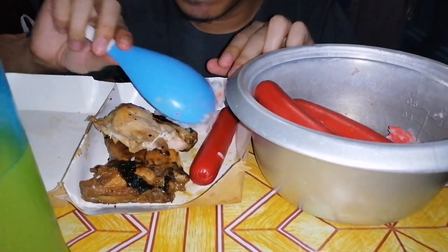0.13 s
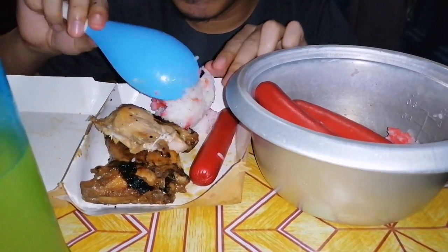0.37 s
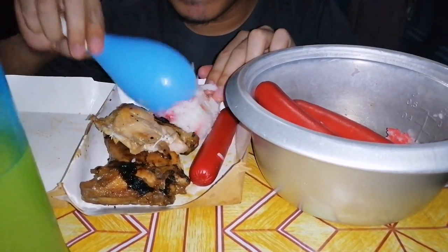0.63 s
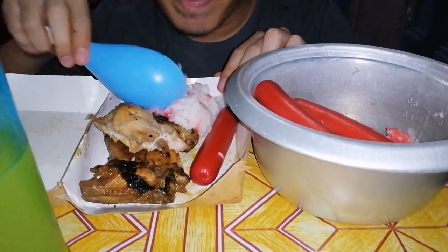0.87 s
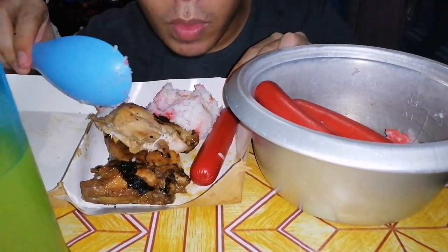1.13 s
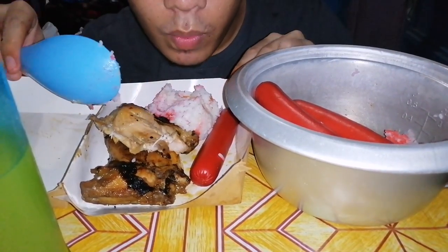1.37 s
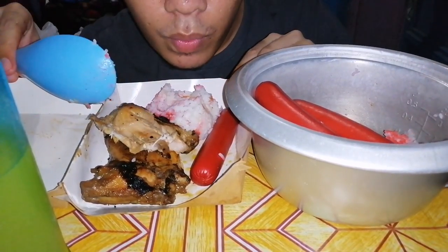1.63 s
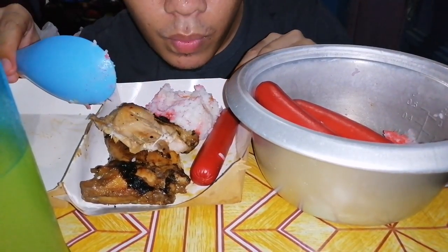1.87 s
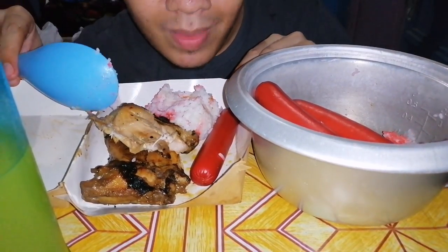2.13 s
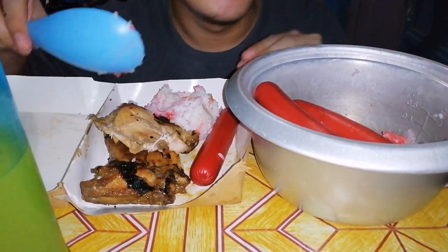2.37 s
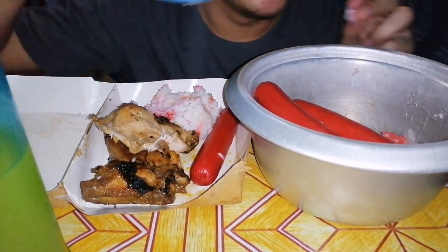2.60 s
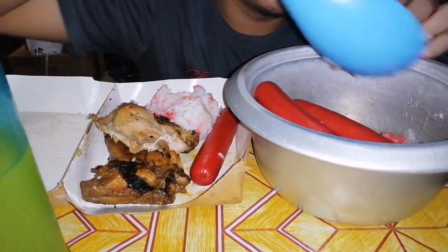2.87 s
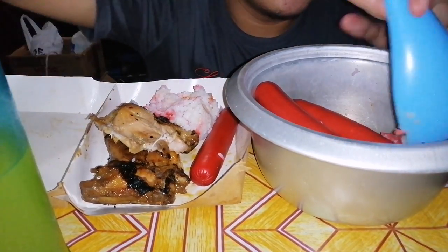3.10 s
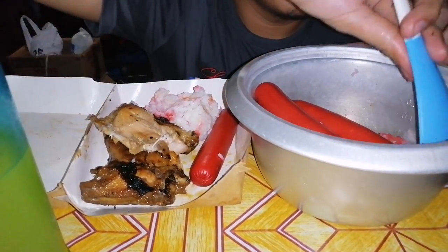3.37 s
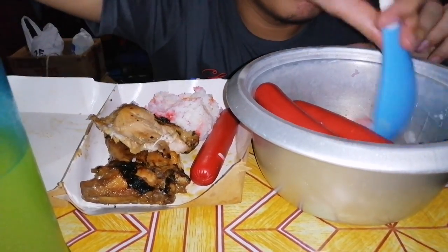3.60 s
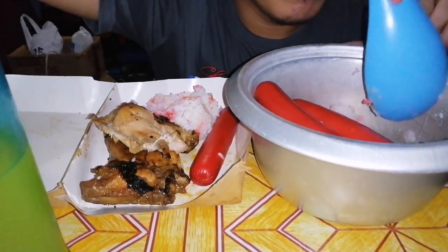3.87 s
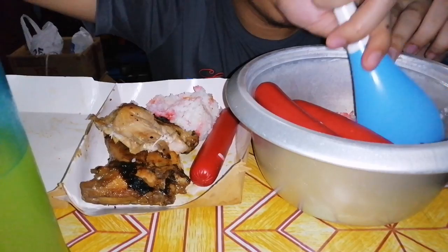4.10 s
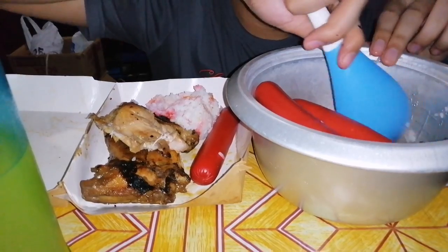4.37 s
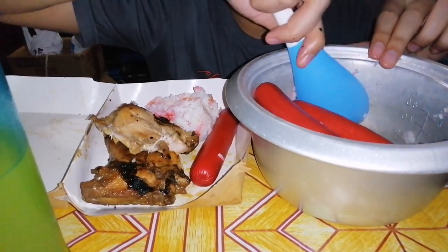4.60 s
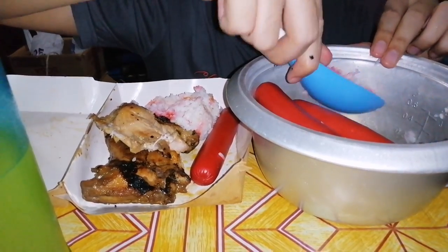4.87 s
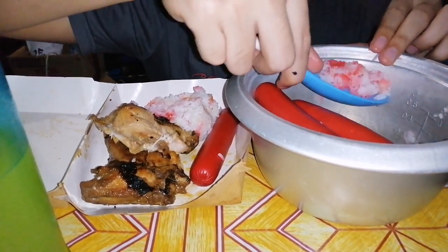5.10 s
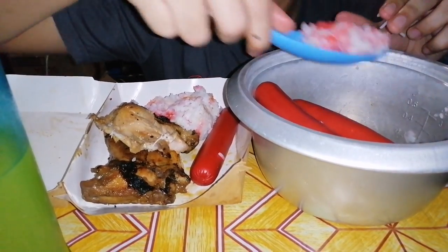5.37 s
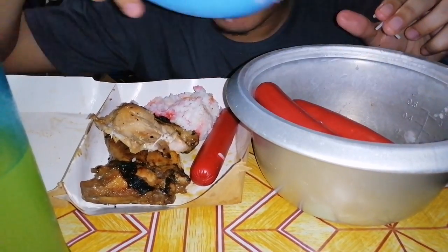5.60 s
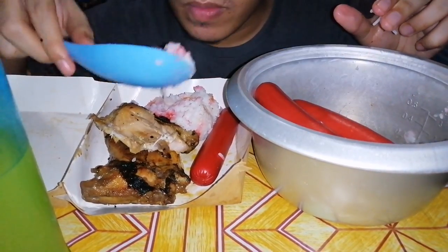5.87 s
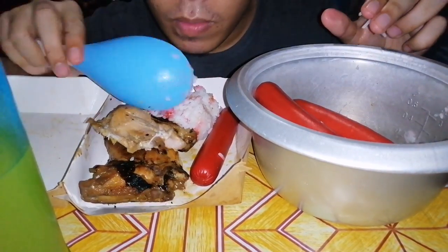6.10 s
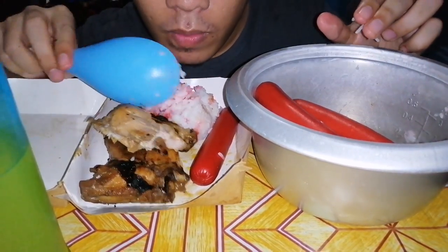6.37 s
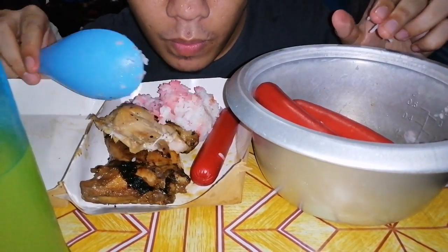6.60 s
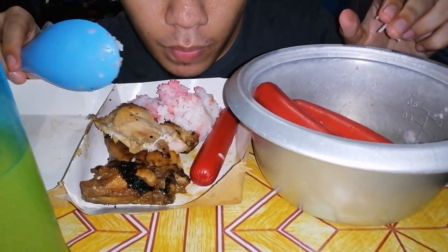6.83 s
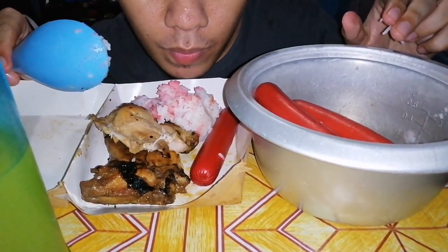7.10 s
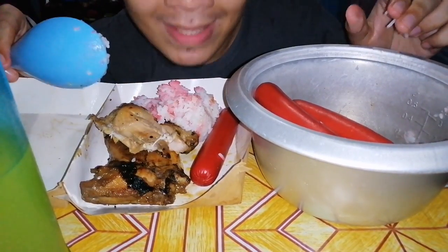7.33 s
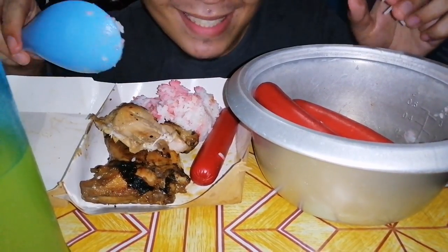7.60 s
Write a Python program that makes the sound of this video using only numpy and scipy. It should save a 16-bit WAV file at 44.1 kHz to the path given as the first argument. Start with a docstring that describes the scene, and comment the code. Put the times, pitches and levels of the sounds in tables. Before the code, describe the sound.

Close stereo pickup in a small room with a low wavering fan hum. A plastic spoon quickly pats rice on a card tray, then sticky grains tick faintly. After a quiet pause it clinks a thin aluminium pot, clatters brightly, thuds, and scrapes a gritty scoop out while the table shudders. Soft tray taps and rustle follow, then only the fan.

```python
"""Spoon, rice and pot

In a small room with a humming fan, a plastic spoon pats rice onto a card tray, knocks a thin aluminium
pot and scrapes a scoop out of it; the recorder's stereo widening turns the phase between left and right.
Pot and card are ringing modes, clatter is decaying noise, rasp and rustle are dense clicks; sticky grains
tick as they part. The fan is wavering sines over room air, and the shoved pot makes the table top shudder.
"""
import sys
import numpy as np
from scipy import signal
from scipy.fft import rfft, irfft, next_fast_len
from scipy.io import wavfile
from scipy.ndimage import uniform_filter1d

SR = 44100
rng = np.random.default_rng(int(sys.argv[2]) if len(sys.argv) > 2 else 0)


def master_out(mix):
    """Clip the mix to full scale and print it as 16-bit PCM to the path in sys.argv[1]."""
    frames = np.transpose(np.atleast_2d(mix))
    ceiling = np.clip(frames, -1, 1)
    pcm = np.round(ceiling * 32767).astype(np.int16)
    wavfile.write(sys.argv[1], SR, pcm)


def how_loud(loudness_db):
    """Turn decibels into a plain amplitude multiplier (0 dB gives 1, 20 dB gives 10)."""
    steps = np.asarray(loudness_db, float) / 20
    return 10 ** steps


N = 340452
T = np.arange(N) / SR
SIZE = next_fast_len(N + SR // 2)
HZ = np.maximum(np.arange(SIZE // 2 + 1) * SR / SIZE, 1)
LOUD_DB = -47.5   # rasp or rustle level at which the grain sizzle has its own set level


def rms_one(x):
    """Scale to rms 1."""
    return x / np.sqrt(np.mean(x ** 2) + 1e-20)


def at_hz(points):
    """Read (Hz, value) points on the frequency grid, straight between them in log frequency."""
    hz, value = np.transpose(points)
    return np.interp(np.log(HZ), np.log(hz), value)


def colour(x, spectrum):
    """Shape by a spectrum in dB per Hz; unit white noise lands on its levels."""
    gain = how_loud(at_hz(spectrum)) * np.sqrt(SR / 2)
    return irfft(rfft(x, SIZE) * gain, SIZE)[..., :N]


def drift(rate_hz):
    """Slow random wander of spread 1: noise through two equal poles, run at every 40th sample."""
    r = np.exp(-80 * np.pi * rate_hz / SR)
    noise = rng.standard_normal(N // 40 + 2002)
    slow = signal.lfilter([1], [1, -2 * r, r * r], noise)[2000:]   # drop the settling
    slow = rms_one(slow - slow.mean())
    return np.interp(np.arange(N) / 40, np.arange(len(slow)), slow)


def ring(clicks, hz, t60):
    """A resonator: a unit click sets a sine of height 1 ringing, 60 dB down after t60 seconds."""
    r, w = how_loud(-60 / (t60 * SR)), 2 * np.pi * hz / SR
    return signal.lfilter([0, np.sin(w)], [1, -2 * r * np.cos(w), r * r], clicks + 1e-18)


def struck(s, hz, t60, rise_s):
    """A dying sine that starts at s, swelling over rise_s."""
    at, out = round(s * SR), np.zeros(N)
    age = T[:min(SR // 4, N - at)]
    tone = np.sin(2 * np.pi * hz * age) * how_loud(-60 * age / t60)
    out[at:at + len(age)] = tone * (1 - np.exp(-age / rise_s))
    return out


def grains(per_s, spread_db, alike):
    """Dense random clicks of either sign, partly the same on left and right; rms 1."""
    size = how_loud(spread_db * np.minimum(rng.exponential(1, (3, N)), 5)) * rng.choice([-1, 1], (3, N))
    clicks = size * (rng.random((3, N)) < per_s / SR)
    return rms_one(np.sqrt(alike) * clicks[0] + np.sqrt(1 - alike) * clicks[1:])


def peaks_db(s, peak_db, rise_db_per_s, fall_db_per_s):
    """Level over time of gestures that climb to a peak and fall away; the loudest counts."""
    age = T[:, None][::64] - s
    level = np.max(peak_db + np.minimum(rise_db_per_s * age, -fall_db_per_s * age), axis=1)
    return np.interp(T, T[::64], level)


# Level balance of a near source. Each row: frequency in Hz, left over right in dB at full shading.
SIDE_BALANCE = [(300, 2), (700, 0.5), (5500, 2.5), (9000, 9), (10500, -1), (12500, -9.5), (15500, 9.5)]
# Turn of phase by the stereo widening. Each row: frequency in Hz, phase lead of left over right in radians.
LEFT_LEAD = [(250, 0.), (420, -.6), (620, -3.1), (1000, -1.1), (1400, -.2), (2500, 3.), (16000, 45)]


def widen(x, shading):
    """Stereo widening and balance: half of the level and phase difference goes to each side."""
    level = how_loud(shading * at_hz(SIDE_BALANCE) / 2)
    half = level * np.exp(0.5j * np.interp(HZ, *np.transpose(LEFT_LEAD)))
    late = np.exp(-2j * np.pi * HZ * 12 / SR)   # both sides 12 samples later
    return irfft(rfft(x, SIZE) * late * np.array([half, 1 / half]), SIZE)[:, :N]


# Fan motor orders. Each row: frequency in Hz, middle level in dB rms before the lift, limit of the waver in dB.
HUM = [(39.3, -66, 0.5), (58.7, -52.5, 2.5), (77.2, -68.5, -0.7), (97.1, -59.5, 1), (118.4, -51.5, 4.5),
       (176.6, -69, 4.5), (287, -74, 6.5)]
# Room air shared by left and right. Each row: frequency in Hz, middle level in dB per Hz.
AIR_SHARED = [(25, -91.5), (55, -68.5), (75, -76), (100, -67.5), (115, -69), (135, -75), (170, -82.5),
              (260, -89), (420, -93.5), (620, -99), (1000, -104), (1700, -102), (3000, -109), (6300, -124),
              (15500, -140)]
# Diffuse room air, separate on left and right. Each row: frequency in Hz, level in dB per Hz.
AIR_DIFFUSE = [(25, -95), (53, -89), (86, -90), (122, -79), (152, -87), (260, -95), (614, -103),
               (970, -102), (1700, -99), (2500, -101), (3600, -109), (6300, -115), (15500, -126)]
LEAN_S = 0.07   # time scale of the bell-shaped lift of the hum around a shove


def fan():
    """Wavering motor orders, lifted or lowered as the table is pressed, over shared and diffuse air noise."""
    hum = 0
    for hz, db, waver_db in HUM:
        level = np.sqrt(2) * how_loud(db + waver_db * np.tanh(drift(5.5)))
        turns = hz * T + rng.random() + 0.14 * drift(0.95)
        hum = hum + level * np.sin(2 * np.pi * turns)
    hum *= how_loud(sum(lift_db * np.exp(-((T - s) / LEAN_S) ** 2) for s, _, lift_db in SHOVES))
    shared = colour(rng.standard_normal(N), AIR_SHARED) * how_loud(0.5 * drift(0.33))
    diffuse = colour(rng.standard_normal((2, N)), AIR_DIFFUSE)
    return hum + widen(shared, shading=0) + diffuse   # shared air differs only in phase


# The pot is shoved on the table. Each row: peak time in seconds, shudder level in dB,
# change in dB that the pressed table top makes to the fan's hum.
SHOVES = [(3.748, -51, 1), (3.89, -47.5, 5.5), (4.04, -44, 6), (4.52, -47.5, -3.5), (4.68, -44, 4.5),
          (4.96, -43.5, 10.5), (5.09, -42.5, 11.5), (5.37, -63, 5)]
# Colour of the table top's shudder. Each row: frequency in Hz, relative level in dB per Hz.
TABLE_TOP = [(60, 0), (85, -3.5), (100, 17.5), (125, 3), (170, -43)]


def table():
    """The table top shudders under the shoved pot: low noise, equal on left and right."""
    s, shudder_db, _ = np.transpose(SHOVES)
    level = how_loud(peaks_db(s, shudder_db, rise_db_per_s=129, fall_db_per_s=108))
    noise = rng.standard_normal(N)
    return colour(level * noise, TABLE_TOP) / np.std(colour(noise, TABLE_TOP))


# Sticky grains parting. Each row: start in seconds, trail level in dB, snap level in dB above the trail.
TICKS = [(0.7588, -70.5, 3), (0.7674, -73, 0.), (0.7911, -68, -3), (0.879, -62, 12), (0.9602, -75.5, 0.),
         (2.8, -62.5, 8), (2.8235, -66, 0.), (2.8858, -65.5, -6), (3.5494, -69, -6), (5.622, -69, -4),
         (5.6894, -76.5, 4), (6.1554, -75, 0.), (6.301, -63, 3)]
# Colour of a tick. Each row: frequency in Hz, relative level in dB per Hz.
TICK = [(3000, -25), (6000, -1.5), (9500, 1.5), (12500, -3), (15500, -27)]
TRAIL_T60_S, SNAP_T60_S = 0.15, 0.0038


def ticks():
    """A sharp bright snap, then a short smooth trail as the room answers."""
    envelope = np.zeros(N)
    for s, trail_db, snap_db in TICKS:
        at = round(s * SR)
        age = T[:min(SR // 2, N - at)]
        trail = how_loud(-60 * age / TRAIL_T60_S)
        snap = how_loud(snap_db - 60 * age / SNAP_T60_S)
        envelope[at:at + len(age)] += how_loud(trail_db) * (trail + snap)
    crackle = grains(per_s=20000, spread_db=1.5, alike=0.4)
    return envelope * rms_one(colour(crackle, TICK))


# Spoon on the card tray. Each row: start in seconds, level in dB, card pitch in Hz.
TAPS = [(0.164, -53, 1116), (.197, -36.5, 977), (.221, -50, 980), (2.352, -57, 1220), (6.262, -56, 1184),
        (6.277, -48, 1180), (6.3, -43.5, 1140), (6.322, -49.5, 1140)]
# Card modes. Each row: multiple of the card pitch, level in dB over the tap, t60 in seconds.
TRAY = [(0.998, 3, 0.041), (1.27, -23, 0.019), (1.71, -10.5, 0.083), (2.05, -10.5, 0.0236),
        (2.6, -18, 0.049), (3.1, -34, .03)]
# Spoon pressing rice on the tray. Each row: peak time in seconds, rustle level in dB, rise in dB per second.
PRESS = [(0.1, -61, 900), (0.168, -64, 2500), (0.201, -45, 500), (2.352, -60.5, 3000), (6.16, -70, 599.5),
         (6.275, -57.5, 204), (6.305, -50, 2000), (6.515, -60, 260)]
# Colour of the pressed rice. Each row: frequency in Hz, relative level in dB per Hz.
RUSTLE = [(300, -27), (600, -2), (1160, -1), (1700, -1.5), (2500, -2.5), (3500, -14.5), (5500, -14),
          (9000, -25.5)]
PRESS_SIZZLE_DB, PRESS_SIZZLE_FOLLOWS = -67, 0.78   # sizzle when the rustle is at LOUD_DB; share of its swing


def tray():
    """Taps ring the card briefly, at a pitch set by its load; pressed rice rustles around them."""
    taps = np.zeros((2, N))
    for s, peak_db, pitch_hz in TAPS:
        for multiple, level_db, t60 in TRAY:
            level = how_loud(peak_db + level_db + rng.normal(0, 1.8))
            taps += level * struck(s, multiple * pitch_hz, t60, rise_s=0.0003)
    s, peak_db, rise = np.transpose(PRESS)
    rustle_db = peaks_db(s, peak_db, rise, fall_db_per_s=297)
    rustle = rms_one(colour(grains(per_s=5700, spread_db=1.0, alike=0.13), RUSTLE))
    sizzle = rms_one(colour(grains(per_s=2000, spread_db=3.0, alike=0.4), SIZZLE))
    sizzle_db = PRESS_SIZZLE_DB + PRESS_SIZZLE_FOLLOWS * (rustle_db - LOUD_DB)
    return taps + how_loud(rustle_db) * rustle + how_loud(sizzle_db) * sizzle


# Spoon dragged through rice along the pot, three short digs and a long scoop.
# Each row: time in seconds, rasp level in dB before the edge catches.
SCRAPE = [(4.375, -85), (4.388, -68.5), (4.465, -54.5), (4.495, -64.5), (4.51, -49.5), (4.545, -51.5),
          (4.575, -62.5), (4.64, -56.5), (4.695, -52.5), (4.72, -65.5), (4.755, -60), (4.77, -57.5),
          (4.81, -53.5), (4.855, -44.5), (4.97, -39.5), (5.05, -42), (5.1, -47.5), (5.13, -59.5),
          (5.195, -68.5), (5.22, -95.5)]
# Colours of the rasp, the fine grain sizzle (the tray has it too) and the dull bumps in the rice.
# Each row: frequency in Hz, relative level in dB per Hz.
RASP = [(300, -48), (480, -2.5), (640, -5), (805, 0.5), (920, -5), (1090, 0), (1270, -7.5), (1500, -2.5),
        (1880, 0), (2350, 0), (2900, -11.5), (3530, -17.5), (4500, -16.5), (6000, -25)]
SIZZLE = [(2500, -32), (4200, -11), (5100, -6), (5800, 1), (6600, -7), (7300, -4), (8200, 0), (8800, -3),
          (9300, 1.5), (10000, -.6), (10600, 3), (11400, -4), (13000, -8), (15500, -14)]
RUMBLE = [(150, -28), (250, 2.5), (320, 4), (410, -3.5), (520, -2.5), (700, -54)]
# The dragged edge sets the ringing mode nearest a pitch singing. Each row: start in seconds, pitch in Hz, level
# in dB.
SINGS = [(4.672, 1440, -42), (4.688, 410, -36), (4.772, 795, -36.5), (4.929, 2040, -30), (4.99, 795, -29.5),
         (5.05, 2300, -30), (5.075, 2008, -54)]
SIZZLE_DB, SIZZLE_FOLLOWS = -53.5, 0.7   # sizzle when the rasp is at LOUD_DB; share of the rasp's swing
DIG_DB, LIFTED_DB = 4, -17               # bumps over the rasp while deep in the rice, and once lifted
LIFT_S, LIFT_DB_PER_S = 4.7, 195


def scrape():
    """Grains crushed along the wall: a rasp that also rings the pot, a fine sizzle and dull bumps."""
    rasp_db = np.interp(T, *np.transpose(SCRAPE), left=-150, right=-150)
    catch_db = drift(40)   # the edge catches and lets go
    slips = grains(per_s=6000, spread_db=3.0, alike=0.4) * how_loud(rasp_db + catch_db)
    metal = 0
    for hz, t60, *_ in POT_MODES[3:17]:
        push = slips[0] * how_loud(6 * drift(12))
        metal = metal + ring(push, hz, t60 * 0.5) / np.sqrt(t60)   # the ring lasts half as long
    rasp = rms_one(colour(slips, RASP)) + how_loud(-3) * rms_one(colour(metal, RASP))
    rasp *= np.sqrt(np.mean(slips ** 2))

    crushed = grains(per_s=9000, spread_db=1.5, alike=0.18)
    edges = np.geomspace(2500, 16000, 9)
    fine = 0
    for edge_pair in zip(edges, edges[1:]):   # crushed grains shift their colour in patches
        band = signal.butter(2, edge_pair, "band", fs=SR, output="sos")
        fine = fine + signal.sosfilt(band, crushed) * how_loud(1.5 * drift(25))
    sizzle_db = SIZZLE_DB + SIZZLE_FOLLOWS * (rasp_db - LOUD_DB) + 0.48 * catch_db
    sizzle = rms_one(colour(fine, SIZZLE)) * how_loud(sizzle_db)

    bump_db = rasp_db + np.clip(DIG_DB - LIFT_DB_PER_S * (T - LIFT_S), LIFTED_DB, DIG_DB)
    bumps = rms_one(colour(grains(per_s=900, spread_db=1.5, alike=0.93), RUMBLE)) * how_loud(bump_db)
    sings = np.zeros(N)
    for s, pitch_hz, db in SINGS:
        hz, t60, *_ = min(POT_MODES, key=lambda mode: abs(mode[0] - pitch_hz))
        sings += how_loud(db) * struck(s, hz, t60, rise_s=0.0032)
    return rasp + sizzle + sings + bumps


# Dense upper modes and near walls blur into a clatter. Each row: frequency in Hz, relative level in dB per Hz.
CLATTER = [(120, -29), (200, 1), (400, -8.5), (600, 9.5), (850, -11.5), (1100, -14), (1500, -5),
           (2800, -11), (4000, -14), (5500, -13.5), (6900, -18), (7900, -8.5), (10000, -9.5), (15000, -12)]
# Each row: frequency in Hz, t60 of the clatter in seconds.
CLATTER_T60 = [(200, 0.15), (530, 0.096), (1390, 0.19), (3680, 0.17), (9700, 0.17)]


def clatter_response(alike):
    """Third-octave noise bands that each die at their own rate, from rms 1, with a crack at the start."""
    t, edges = T[:SR // 2], 130 * 2 ** (np.arange(22) / 3)
    white = rng.standard_normal((3, N))
    high = signal.butter(2, 450, "high", fs=SR, output="sos")
    own = signal.sosfilt(high, white[1:])   # long waves reach left and right alike
    white = np.sqrt(alike) * white[0] + np.sqrt(1 - alike) * own
    noise = rms_one(colour(white, CLATTER))[:, :SR // 2]
    hz, t60 = np.transpose(CLATTER_T60)
    out = 0
    for low, top in zip(edges, edges[1:]):
        band = signal.butter(2, [low, top], "band", fs=SR, output="sos")
        band_t60 = np.interp(np.log(low), np.log(hz), t60)
        out = out + signal.sosfilt(band, noise) * how_loud(-60 * t / band_t60)
    return out * (1 + 5.1 * how_loud(-60 * t / 0.01))   # the crack of the contact


# Spoon on pot. Each row: start in seconds, place (0 lip, 1 rim, 2 wall, 3 base, 4 far wall, or between; values
# beyond count as the nearest end), ring gain in dB, clatter gain in dB, contact cut-off in Hz.
KNOCKS = [(3.1383, -0.5, -7.5, -22, 8100), (3.144, 0, -3, -24, 4500), (3.621, 2.5, -21.5, -33.5, 6050),
          (3.690, 0.95, 2.5, -7.5, 8850), (3.696, 3, -5.5, -8, 9000), (3.706, 1, -7, -15.5, 6040),
          (3.7569, 1.35, 1.5, -11.5, 8500), (3.856, 2, -29.5, -45.5, 1510), (4.009, 3, 2, -30, 2434),
          (4.183, 7, -2, -28, 2950), (4.387, 0.5, -31.5, -51, 7000), (4.507, -0.2, -34.5, -40.5, 7040),
          (4.697, 2.5, -25.5, -37, 1470)]
# Pot foot on the table. Each row: frequency in Hz, gain in dB, t60 in seconds.
THUD = [(209, -27.5, 0.068), (270, -31.5, 0.046), (330, -31, 0.057), (476.5, -36, 0.043)]
# Pitches of the ringing modes in Hz: the pot's, and at 795 Hz the spoon's own.
POT_HZ = [196, 410, 574, 680, 795, 1041, 1313, 1405, 1441, 1572, 1670, 2008, 2040, 2297, 2353, 2589, 2798,
          3196, 3784, 4204, 4540, 4865, 5250, 5670, 5950, 6866, 7566, 8160, 9120]
# Each row, for one pitch: t60 in seconds, left over right in dB ahead of the widening,
# then level in dB (before the ring gain) when struck on the lip, the rim, the wall, the base, the far wall.
POT_RING = [(0.12, 3.5, -33, -34.5, -41.5, -31.5, -32), (0.12, 0, -41.5, -40, -45, -39.5, -40),
            (0.11, 7.5, -51.5, -29.5, -29, -21, -36), (0.1, -9, -28, -36, -50, -50.5, -38.5),
            (0.09, -0.5, -49, -43, -50, -60, -55), (0.25, 8.5, -53, -35, -40, -38, -50),
            (0.26, 3.5, -60.5, -43, -41.5, -40.5, -66), (0.34, -0.5, -56, -34.5, -39, -34.5, -50),
            (0.095, 6.5, -55.5, -24, -34, -47, -51), (0.24, 8.5, -40, -38, -40, -45, -55),
            (0.094, 1.5, -28.5, -44, -51, -52, -59), (0.28, 3.5, -41.5, -36.5, -37.5, -35, -51),
            (0.083, 0, -18.5, -45, -60, -60, -62), (0.22, -4, -45, -30.5, -26, -40, -68),
            (0.13, 7.5, -35.5, -31, -38.5, -54, -57.5), (0.089, -9.5, -42, -40, -55, -70.5, -64),
            (0.37, -13.5, -48, -31.5, -32.5, -55, -45), (0.22, -6, -44.5, -39, -36.5, -74, -68),
            (0.064, -1.5, -51.5, -39.5, -39, -70.5, -62), (0.22, -10.5, -65, -41, -47, -78.5, -78),
            (0.18, 3.5, -65, -42, -47, -78.5, -70), (0.17, 7, -60, -36.5, -50.5, -85, -77.5),
            (0.22, 4, -50, -43, -53, -80, -75), (0.1, 10, -55.5, -43, -48, -80.5, -68),
            (0.12, -0.5, -43, -43, -49.5, -70, -78), (0.12, 6.5, -60.5, -41, -54, -79.5, -78),
            (0.13, 7.5, -55, -36, -39.5, -80, -75), (0.05, 6, -56, -35.5, -40, -87.5, -75),
            (0.07, 13.5, -46, -37.5, -44, -68.5, -59)]
POT_MODES = [(hz, *rest) for hz, rest in zip(POT_HZ, POT_RING)]
CHATTER_S = 0.005   # the spoon rebounds for up to this long after each blow


def knocks():
    """Each blow is a short chatter of contacts: it rings the modes of its place and sets off the clatter."""
    push, out = np.zeros(N), np.zeros((2, N))
    touches = np.searchsorted(np.transpose(KNOCKS)[0], T)   # blows so far
    for k, (s, place, ring_db, clatter_db, cut_hz) in enumerate(KNOCKS):
        at = np.round((s + CHATTER_S * np.sort(np.r_[0, rng.random(5)])) * SR).astype(int)
        span = slice(at[0], at[0] + SR // 3)
        age = T[span] - s
        bounces = np.full(len(age), 1e-18)
        rebound_db = rng.normal(-6, 1.5, 6) - 1.2 * np.arange(6)   # rebounds tend to weaken
        bounces[at - at[0]] = how_loud(clatter_db + rebound_db)
        soft = signal.butter(3, min(cut_hz, SR / 3), fs=SR, output="sos")
        push[span] += signal.sosfilt(soft, bounces) * SR / 2 / cut_hz

        later = uniform_filter1d(np.maximum(touches[span] - k - 1.0, 0), 200)
        held = how_loud(ring_db - 4.2 * later)   # later touches damp it
        held *= 1 - np.exp(-np.maximum(age, 0) * cut_hz)   # a softer contact builds up more slowly
        for hz, t60, pan_db, *place_db in POT_MODES:
            tone = np.sin(2 * np.pi * hz * age) * how_loud(-60 * age / t60) * held
            level = np.interp(place, range(5), how_loud(place_db))
            out[:, span] += level * tone * how_loud(np.array([[0.5], [-0.5]]) * pan_db)
    out += signal.fftconvolve(push[None], clatter_response(alike=0.24), axes=1)[:, :N] / 4
    out += sum(how_loud(db) * ring(push, hz, t60) for hz, db, t60 in THUD)
    high = signal.butter(2, 130, "high", fs=SR, output="sos")
    return signal.sosfilt(high, out)   # the knocks carry no deep bass


def scene():
    """Near sources are balanced and widened; the table shudders and the fan fills the room."""
    near = knocks() + scrape() + tray() + ticks()
    return widen(near, shading=0.83) + table() + fan()


def roll_off(x):
    """The treble ends steeply here."""
    return signal.sosfilt(signal.butter(12, 15750, fs=SR, output="sos"), x)


def record(dry):
    """The top is cut steeply, 60 dB down from 16200 Hz."""
    cut = signal.cheby2(12, 60, 16200, fs=SR, output="sos")
    mix = signal.sosfilt(cut, dry)
    return roll_off(mix)


dry = scene()
out = record(dry)
master_out(out)
```